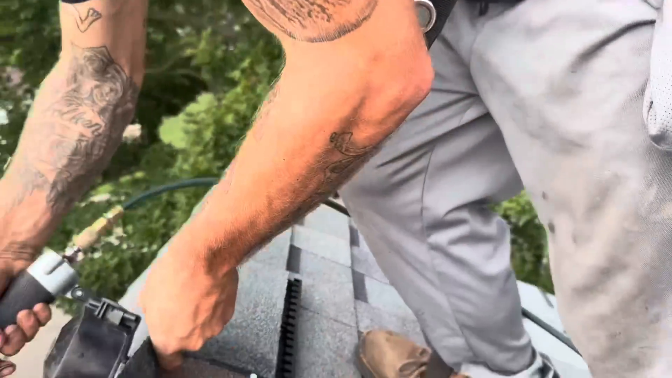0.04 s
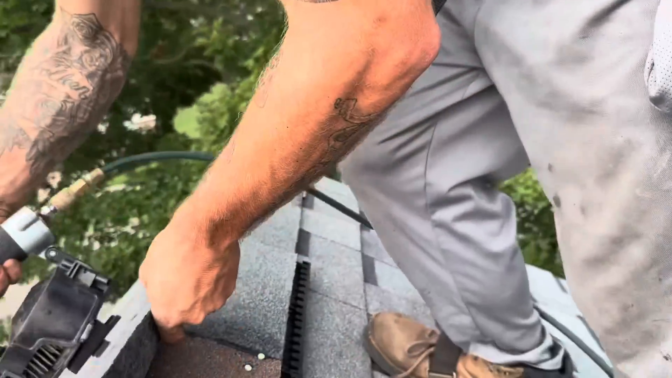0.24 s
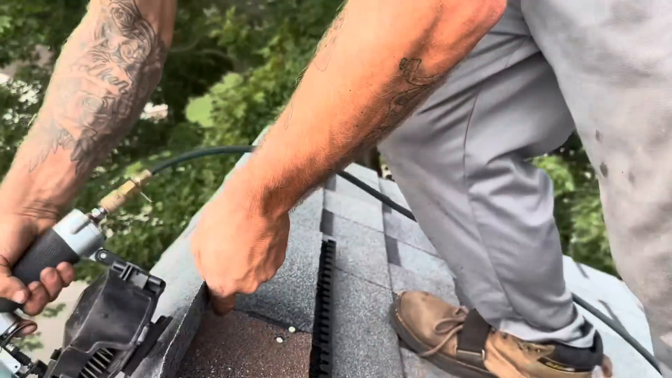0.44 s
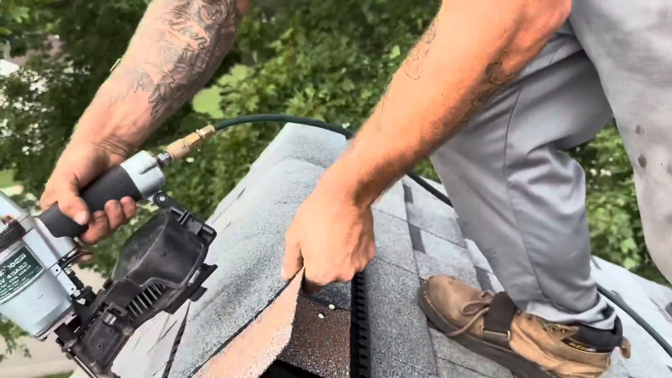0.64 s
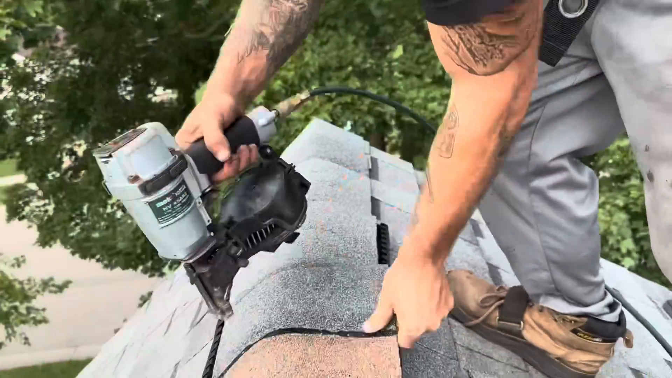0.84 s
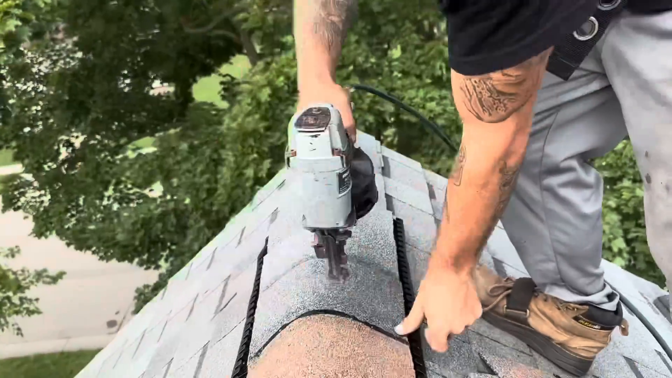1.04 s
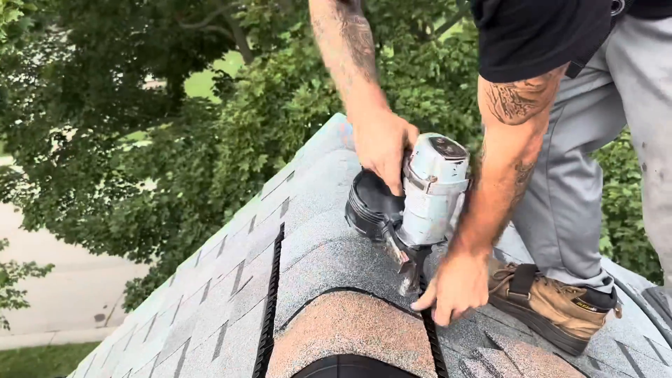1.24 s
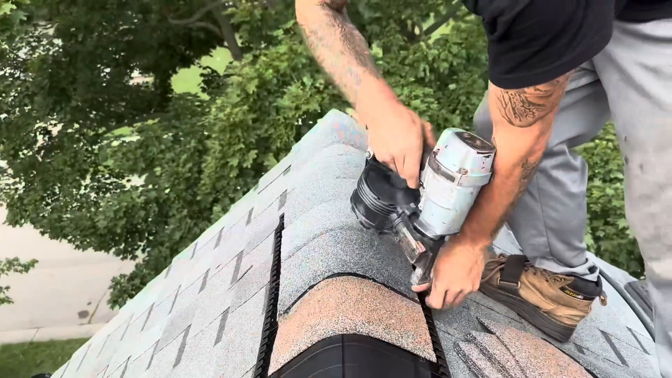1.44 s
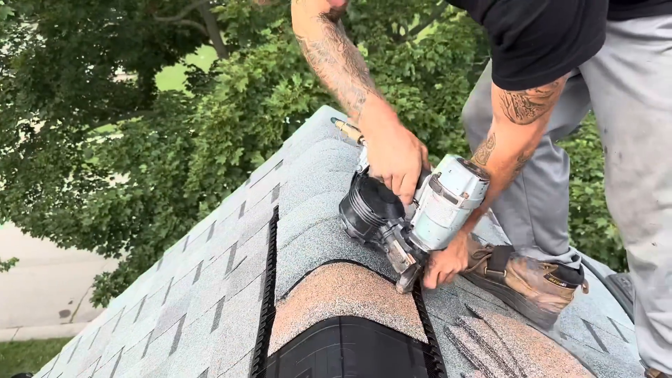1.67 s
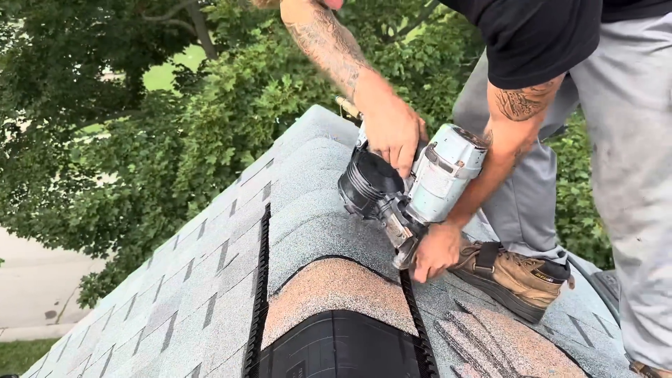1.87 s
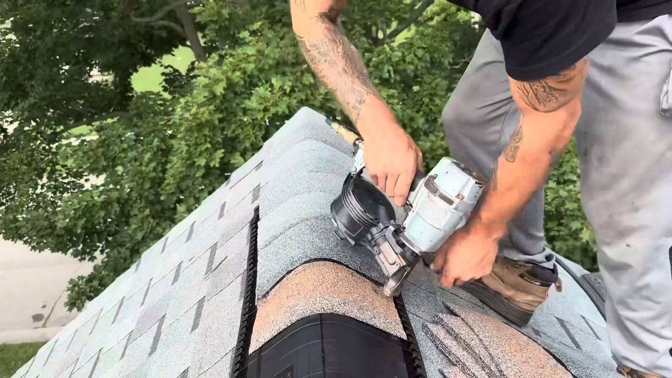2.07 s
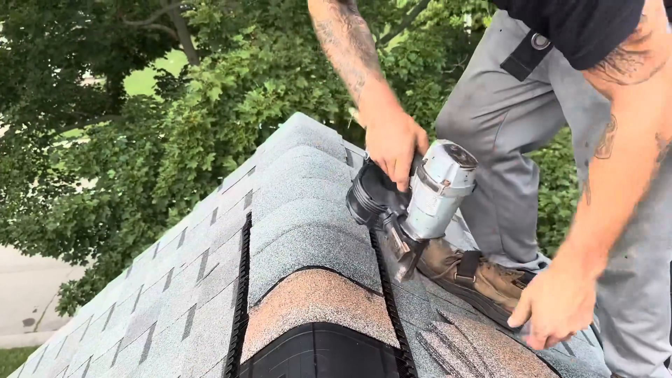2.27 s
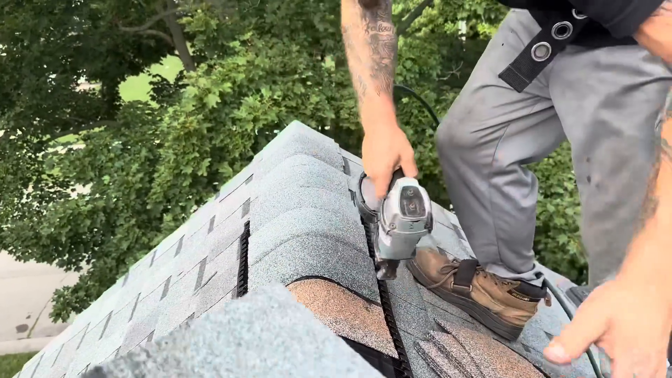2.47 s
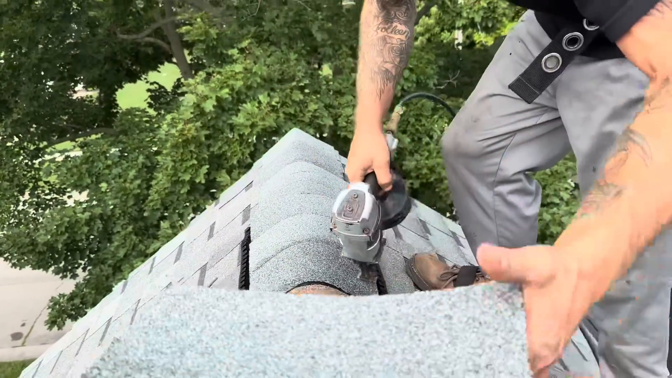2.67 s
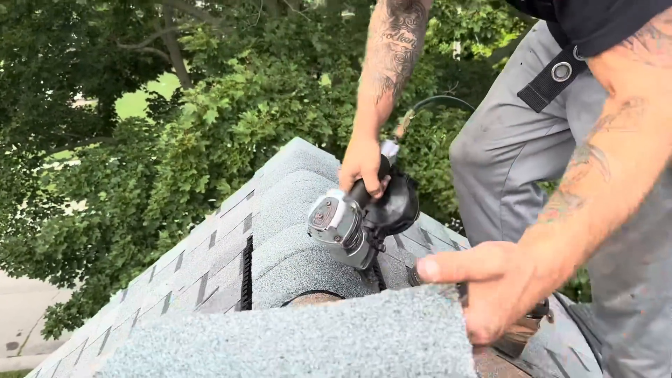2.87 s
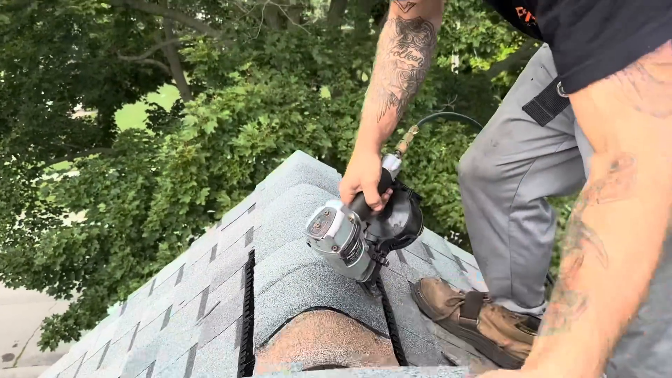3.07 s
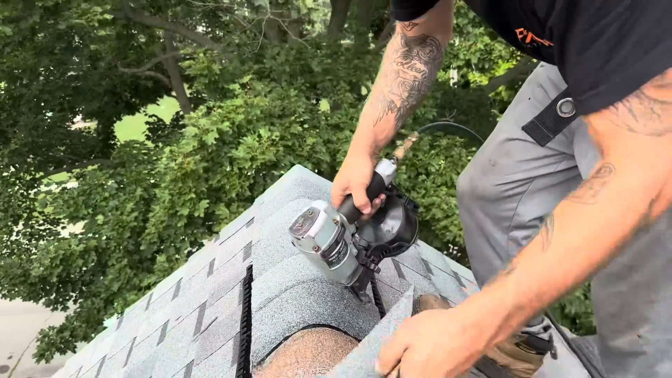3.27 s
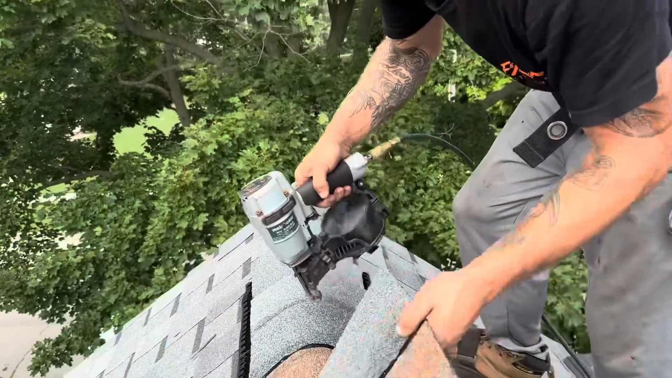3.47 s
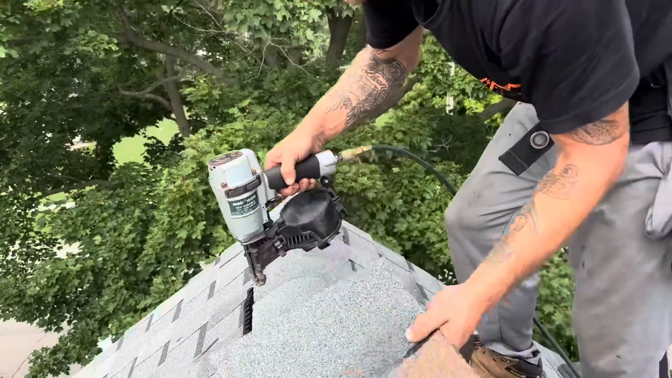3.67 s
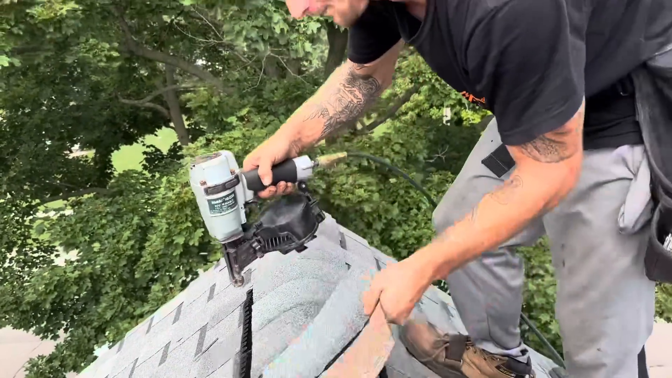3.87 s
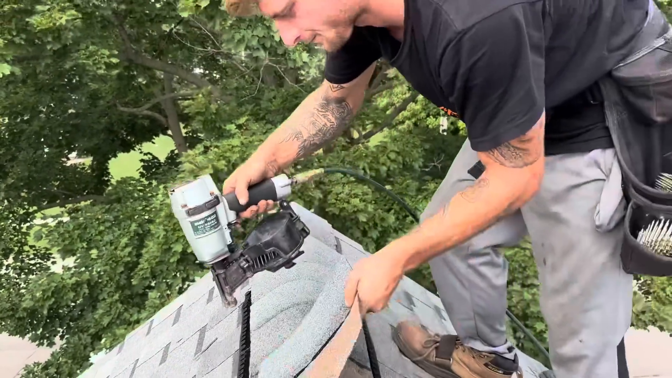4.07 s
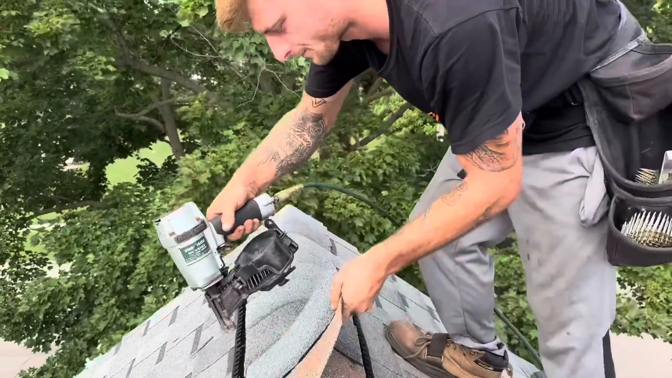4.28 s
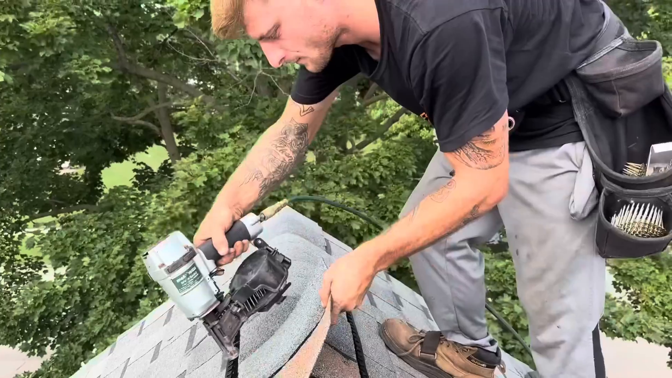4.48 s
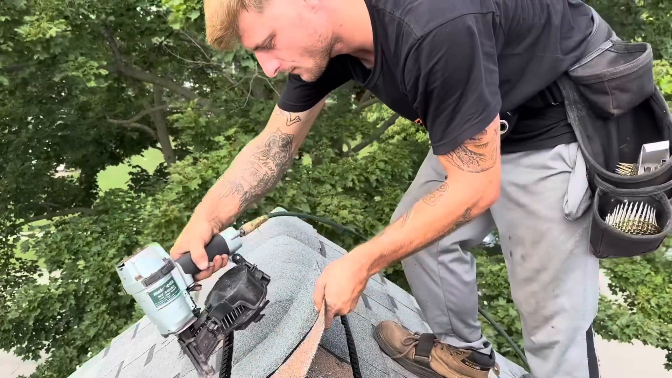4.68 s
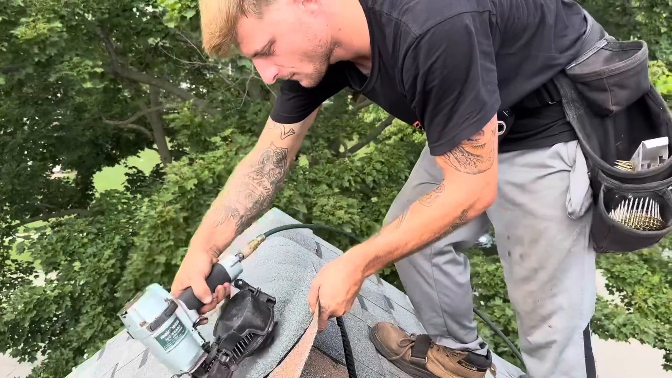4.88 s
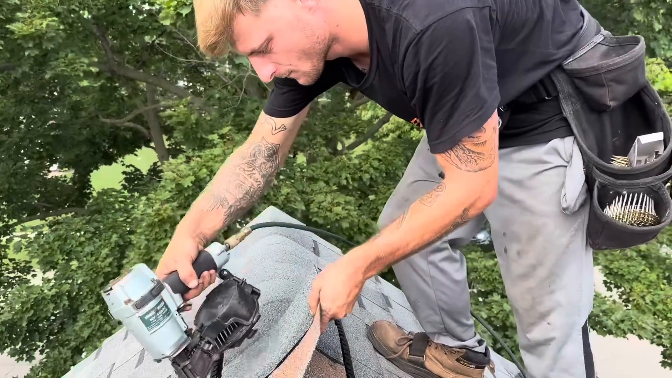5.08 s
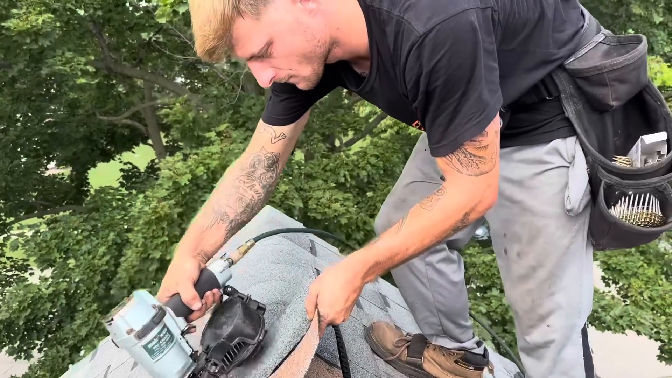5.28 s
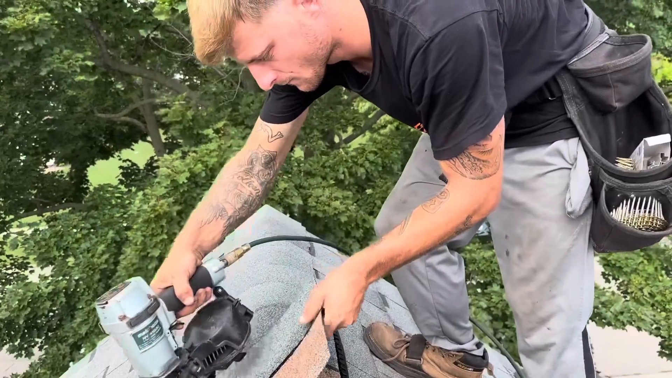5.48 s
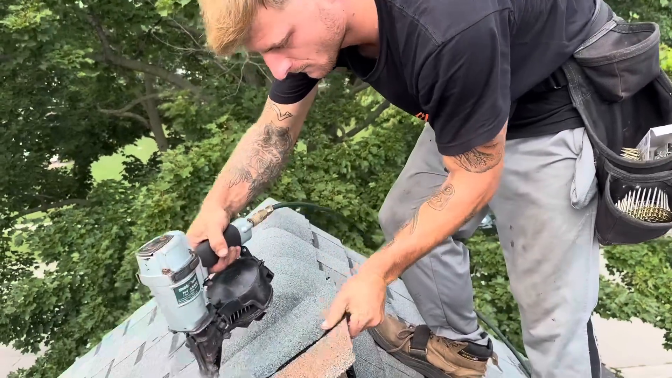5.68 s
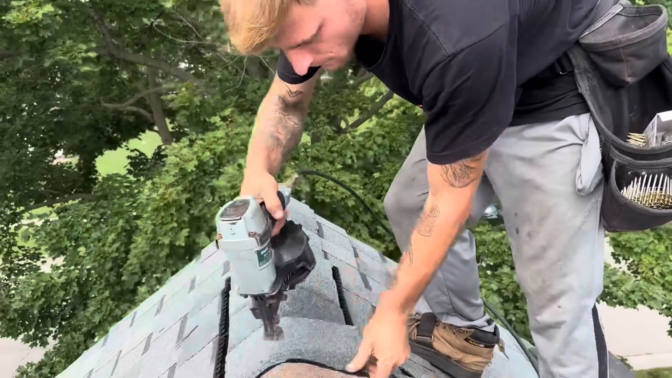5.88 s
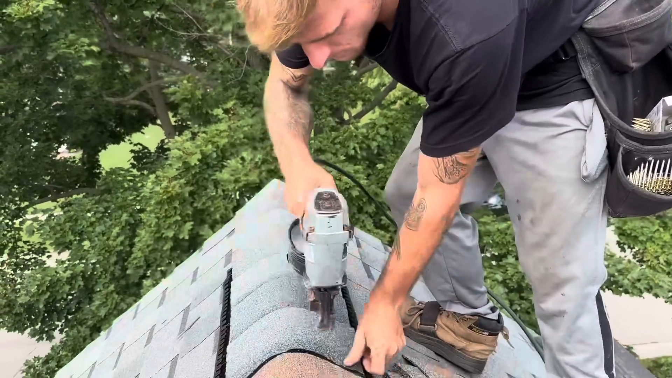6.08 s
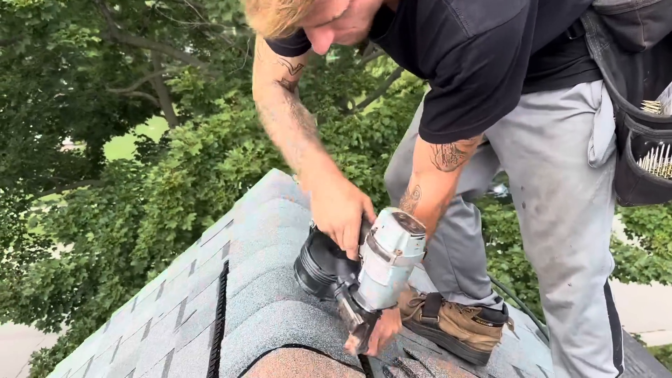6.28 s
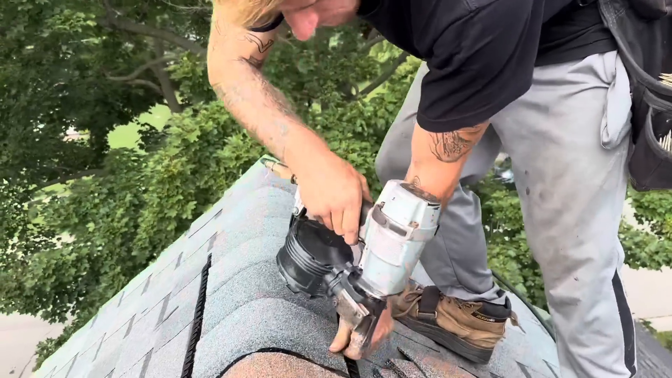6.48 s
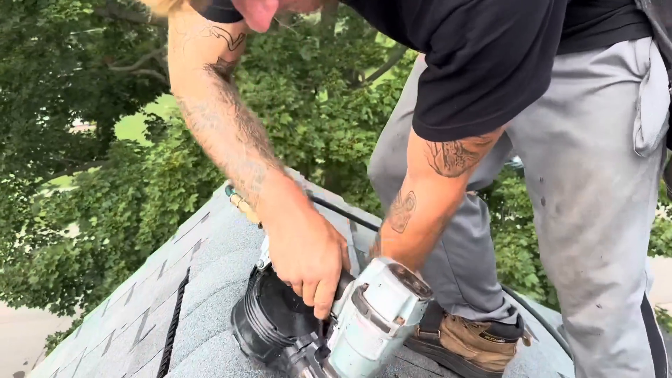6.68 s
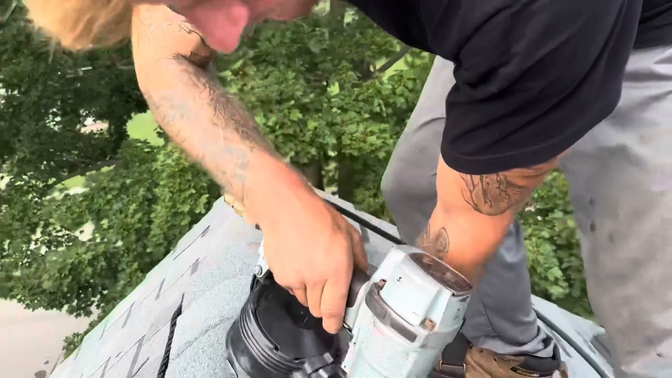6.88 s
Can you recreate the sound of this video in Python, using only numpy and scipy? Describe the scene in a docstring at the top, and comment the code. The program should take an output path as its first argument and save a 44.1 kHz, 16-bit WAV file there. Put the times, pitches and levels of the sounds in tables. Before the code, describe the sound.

A compressed-air nailer cracks seven sharp shots into a shingled roof, with bright hissing leaks around them and gritty shingle scrapes between.

```python
"""Shingle roof: a compressed-air nailer at arm's length from two microphones. Air leaks from the pressed
trigger valve as wavering, coloured noise. Each shot is a valve tick, three metal knocks of ringing tool modes,
and a falling thud through the deck, which booms on in beating modes. Between rounds hands drag gritty shingles:
noise grains, slaps and ticks over a faint hum. Spent air buffets the microphones as low fluttering noise."""
import sys
import numpy as np
from scipy import signal
from scipy.fft import rfft, irfft
from scipy.io import wavfile
from scipy.ndimage import uniform_filter1d

SR = 44100
rng = np.random.default_rng(int(sys.argv[2]) if len(sys.argv) > 2 else 0)


def transcribe(signal):
    """Save signal, clipped to [-1, 1], as a 16-bit WAV file at the path in sys.argv[1]."""
    frames = np.atleast_2d(signal).T
    limited = np.clip(frames, -1, 1)
    pcm = np.round(limited * 32767).astype(np.int16)
    wavfile.write(sys.argv[1], SR, pcm)


N = 305425
T = np.arange(N) / SR
F = np.maximum(np.fft.rfftfreq(N, 1 / SR), 1)

# Jet spectrum: [pitch_hz, density_db_per_hz]
JET_SPECTRUM = [(300, -24), (900, -22), (2000, -14.5), (3000, -12), (4000, -10.5), (5400, -9), (6800, -6.5),
                (8500, -1.5), (9600, -5), (11300, 3), (12300, 4.5), (13200, 3.5), (14000, 8), (15000, -2.5)]
# Trigger holds: [press_s, release_s, top_level_db, drift_db_per_s, high_share_db, low_share_db, build_up_s,
# overshoot_db, puff_level_db, puff_length_s]
TRIGGER_HOLDS = [(-.3, 0.523, -24, -3.5, 1, -5, .02, 7, -30.5, 0.03),
                 (1.193, 2.121, -24, 2.5, -1.5, -7.5, 0.029, 8, -33.5, 0.0045),
                 (4.423, 5.454, -23, 0, -2.5, -8, 0.0072, 4, -30, 0.0045),
                 (6.233, 7.195, -23, 3, -0.5, -7.5, 0.023, 4, -38, .006)]
# Tool position per hold, where the ports hear the leak in opposite phase: [null_hz, width_hz]
PORT_NULLS = [(2700, 600), (7400, 300), (3150, 1000), (5500, 600)]
SURGE_S, LOW_SURGE = 0.076, 1.9  # overshoot decay; lows overshoot more
SHUT_S, SHUT_DB, BLEED_DB_PER_S, TOP_BLEED_DB_PER_S = 0.023, 23, 71.5, 88  # top bleed adds to the common bleed
LOW_SAG, LOW_CUT = 0.88, 0.45  # share of sag and cut felt by the lows


def leak():
    """Turbulent jet from the trigger valve; each narrow band wavers as the tool turns in the hand."""
    low, high, top = jet_bands()
    sag_db, cut_db = pressure()
    out = 0
    for hold, (null_hz, width_hz) in zip(TRIGGER_HOLDS, PORT_NULLS):
        press, release, top_db, drift_db, high_db, low_db, build_s, surge_db, puff_db, puff_s = hold
        since, after = np.maximum(T - press, 0), np.maximum(T - release, 0)
        opened = 1 - np.exp(-since / build_s)
        surge = surge_db * np.exp(-since / SURGE_S)
        shut = undb(-SHUT_DB * (1 - np.exp(-after / SHUT_S)) - BLEED_DB_PER_S * after)
        held = undb(top_db + drift_db * np.minimum(since, release - press)) * opened * shut
        puff = undb(puff_db) * np.exp(-((T - release) / puff_s) ** 2)
        upper_gain = held * undb(surge - sag_db - cut_db) + puff
        low_swing_db = LOW_SURGE * surge - LOW_SAG * sag_db - LOW_CUT * cut_db
        low_gain = held * opened * undb(low_swing_db) + puff  # lows build up later
        jet = upper_gain * (top * undb(-TOP_BLEED_DB_PER_S * after) + undb(high_db) * high)
        jet = jet + low_gain * undb(low_db) * low
        out = out + ports(jet, np.pi * (1 + np.tanh((F - null_hz) / width_hz)))
    return out


def jet_bands():
    """Jet noise in third-octave bands wavering apart, summed to low, high and top parts of rms 1."""
    jet = colour(noise(), JET_SPECTRUM)
    low, high, top = 0, 0, 0
    for hz in 300 * 2 ** np.arange(0, 5.9, 1 / 3):
        part = band(jet, hz / 1.104, hz * 1.115) * undb(0.78 * walk(1.5) + 1.1 * walk(40))
        if hz < 6500:
            low = low + part
        elif hz < 10500:
            high = high + part
        else:
            top = top + part
    return unit(low), unit(high), unit(top)


CHOKE_DB, CHOKE_RISE_S = 2.5, 0.0043
SAG_S, REFILL_S = .015, .14
SWELL_DB, SWELL_S = 1.5, 0.064  # leak swells as the nose is pushed down
CUT_FALL_S, CUT_ENDS_S, CUT_RISE_S = 0.0083, 0.056, 0.013


def pressure():
    """Leak drop in dB: choke in the stroke, sag and refill after; recoil can lift the finger, a brief cut."""
    sag, cut = 0, 0
    for s, stroke_s, *_, sag_db, cut_db in SHOTS_FIRED:
        back = s + stroke_s + RETURN_S
        sag = sag + sag_db * ramp(back, SAG_S) * np.exp(-np.maximum(T - back, 0) / REFILL_S)
        sag = sag - SWELL_DB * ramp(s - SWELL_S, SWELL_S) * (T < s)
        cut = cut + CHOKE_DB * ramp(s, CHOKE_RISE_S) * (T < s + stroke_s)
        cut = cut + cut_db * ramp(back, CUT_FALL_S) * (1 - ramp(back + CUT_ENDS_S, CUT_RISE_S))
    return sag, cut


# Shots: [blow_s, exhaust_after_s, blow_db, blow_hz, exhaust_db, return_db, thud_db, thud_glide_s, thud_fall_s,
# boom_share_db, pressure_sag_db, leak_cut_db (negative: leak rises)]
SHOTS_FIRED = [(.02, 0.016, -4, 1480, -6, -9, -18, 0.0091, 0.012, -41, 6.5, -4.5),
               (.379, 0.018, -2.5, 1250, -10, -9.5, -12.5, .005, 0.0099, -55, 10.5, -3.5),
               (1.636, .026, 0, 1180, -7, -8.5, -15, 0.013, 0.0076, -38.5, 8.5, 10.5),
               (2.015, .022, -2.5, 1080, -8, -10, -10, 0.057, 0.007, -24.5, 10, 6),
               (4.914, .017, -1, 1550, -8, -7.5, -14.5, .007, .01, -18.5, 8, -2),
               (5.321, 0.02, -3, 1440, -8.5, -11.5, -11, 0.0058, 0.011, -18, 5, 3.5),
               (6.688, 0.017, -1, 1530, -8, -8.5, -10, 0.0079, 0.012, -32, 12.5, 15)]
VALVE_LEAD_S, VALVE_DB, VALVE_HZ, VALVE_CRACK_DB = .0088, -13.5, 1350, 7.5
RETURN_S, EXHAUST_HZ, RETURN_HZ = .0145, 1140, 850  # piston return follows the exhaust
BLOW_CRACK_DB, EXHAUST_CRACK_DB, RETURN_CRACK_DB = -4, 5, 0.5
VENT_DB, VENT_S = -25, 0.012  # spent air rushes out after the return
PRESS_S, PRESS_DB, CLATTER_DB = 0.033, -32, -26  # nose scuffs down before the blow


def shots():
    """Nose press, valve tick, blow, exhaust and return knocks; vented air; loose parts clatter in the stroke."""
    out = np.zeros((2, N))
    for s, stroke_s, blow_db, blow_hz, exhaust_db, return_db, *_ in SHOTS_FIRED:
        exhaust = s + stroke_s
        back = exhaust + RETURN_S
        add(out, s - .001, undb(blow_db) * knock(blow_hz, BLOW_CRACK_DB))
        add(out, exhaust, undb(exhaust_db) * knock(EXHAUST_HZ, EXHAUST_CRACK_DB))
        add(out, back, undb(return_db) * knock(RETURN_HZ, RETURN_CRACK_DB))
        tick = knock(VALVE_HZ, VALVE_CRACK_DB) * burst(0.00026, 0.0033)
        add(out, s - VALVE_LEAD_S, undb(VALVE_DB) * tick)
        vent = unit(band(rng.standard_normal((2, 4000)), 1500, 8000)) * burst(0.0017, VENT_S, size=4000)
        add(out, back, undb(VENT_DB) * vent)
        jolts = undb(4.0 * np.repeat(rng.standard_normal(100), 40))
        scuff, loose = rng.standard_normal((2, 2, 4000)) * jolts
        scuff = unit(band(scuff, 600, 2500)) * burst(0.005, 0.016, size=4000)
        clatter = unit(band(loose, 200, 1500)) * burst(0.011, 0.018, size=4000)
        add(out, max(s - PRESS_S, 0), undb(PRESS_DB) * scuff)
        add(out, s, undb(CLATTER_DB) * clatter)
    return out


# Tool body modes: [pitch_hz (before grip detuning), level_db, t60_s]
TOOL_MODES = [(447, -4, 0.023), (727, -7.5, 0.041), (1070, -3.5, 0.0096), (1390, -2.5, 0.013),
              (1490, 3.5, 0.01), (1950, -6, 0.0081), (2133, -4.5, 0.029), (3100, -6.5, 0.02),
              (4450, 1, 0.025)]


def knock(hz, crack_db):
    """A few ms of rattle rings the tool body, held a little differently each time, and cracks in the treble."""
    push, air = rng.standard_normal((2, 2, 2600))
    grip = 1 + 0.12 * rng.standard_normal(len(TOOL_MODES))
    rattle = undb(4.0 * np.repeat(rng.standard_normal(130), 20))
    modes = [(f * g, db, t60) for (f, db, t60), g in zip(TOOL_MODES, grip)]
    body = ring(band(push * rattle * burst(.001, 0.0019), hz / 3.07, hz * 2.57), modes)
    crack = band(air * rattle, 2800, 17000) * burst(0.0026, 0.0036)
    return body / abs(body).max() + undb(crack_db) * crack / abs(crack).max()


# Roof deck modes: [pitch_hz, level_db, t60_s]
DECK_MODES = [(48, 2.5, 0.81), (57.3, -6, 0.9), (64.5, -1, 0.63)]
# Boots and tool set down on the deck: [start_s, level_db, boom_share_db]
SET_DOWNS = [(2.173, -34.5, -25), (2.243, -42, -11), (5.514, -20, -44)]
THUD_LAG_S, THUD_HZ, THUD_END_HZ, THUD_RISE_S = 0.0022, 280.5, 45, 0.099
BUMP_HZ, BUMP_GLIDE_S, BUMP_FALL_S = 457, 0.0063, .006


def thuds():
    """Deck bending waves: highs arrive first, scattered by the rafters; then it booms on in beating modes."""
    out, kick, t = np.zeros((2, N)), np.zeros((2, N)), np.arange(6000) / SR
    blows = []
    for s, stroke_s, *_, db, glide_s, fall_s, boom_db, _, _ in SHOTS_FIRED:
        blows.append((s + stroke_s + THUD_LAG_S, db, THUD_HZ, glide_s, fall_s, boom_db))
    for s, db, boom_db in SET_DOWNS:
        blows.append((s, db, BUMP_HZ, BUMP_GLIDE_S, BUMP_FALL_S, boom_db))
    for s, db, first_hz, glide_s, fall_s, boom_db in blows:
        hz = THUD_END_HZ + (first_hz - THUD_END_HZ) * np.exp(-t / glide_s)
        wave = np.sin(2 * np.pi * np.cumsum(hz) / SR + np.array([[0], [np.pi / 2]]))
        scatter = unit(band(band(rng.standard_normal((2, 6000)), 60, 390), 60, 390))
        rough = undb(0.41 * db)  # hard blows shake more of the framing
        thud = burst(THUD_RISE_S, fall_s, size=6000) * wave
        thud = thud + rough * burst(0.011, 0.0071, size=6000) * scatter
        add(out, s, undb(db) * thud)
        add(kick, s + .05, undb(db + boom_db) * np.hanning(440) / 160)
    kick[1] = np.roll(kick[1], 200)  # second row 200 samples late
    return out + ring(kick, DECK_MODES)


# Scraped shingle resonances: [pitch_hz, level_db]
GRIT_MODES = [(480, -7), (700, 1), (1000, 1.2), (1400, 2.2), (1900, -4), (2500, -4.5), (3300, -11)]
# Shingles dragged or shifted: [start_s, end_s, first_db, last_db, treble_share_db]
SHINGLE_DRAGS = [(0.543, 0.663, -47, -55, -2), (0.707, 0.753, -47, -50.5, -15),
                 (.75, .84, -47, -49.5, -6.5), (0.884, 0.983, -56, -55.5, -6),
                 (0.988, 1.025, -38, -46, -18.5), (1.026, 1.2, -60.5, -57.5, -8.5),
                 (2.624, 2.677, -53, -53.5, -7), (2.746, 3.14, -59.5, -64.5, -14.5),
                 (3.244, 3.288, -42.5, -29.5, -14), (3.302, 3.349, -57, -39, -8),
                 (3.357, 3.405, -49, -45, -13), (3.403, 3.447, -43, -45, -12), (3.76, 3.93, -28, -43, -8),
                 (3.943, 4.099, -67, -50, -6.5), (4.102, 4.42, -50, -63.5, -8.5),
                 (5.877, 5.933, -74, -60, -6), (6.104, 6.225, -63, -68, -1)]
# Shingle slaps and grit ticks: [start_s, peak_db, pitch_hz, treble_share_db]
SLAPS = [(0.646, -50, 1080, -6), (0.712, -16.5, 960, -31), (0.756, -32, 2300, -13), (0.765, -26, 1290, -16),
         (0.799, -31.5, 2330, -15), (0.82, -30, 1400, -25), (0.893, -51, 1110, 0), (0.959, -43, 1080, -12),
         (0.995, -31.5, 603, -29), (2.616, -44.5, 913, -18), (2.7, -48, 1070, -20), (2.974, -45, 1410, -30),
         (3.02, -55, 1070, 6), (3.245, -31, 746, -24), (3.271, -20, 960, -12), (3.344, -34.5, 538, -21),
         (3.366, -31, 1060, -26), (3.469, -51, 934, 3), (3.497, -38.5, 1110, -14),
         (3.567, -36, 1250, -17.5), (3.764, -22.5, 705, -8), (3.944, -44, 1800, -18),
         (4.116, -35, 790, -27), (5.913, -50.5, 393, -12.5)]
RUB_DB = 5.5  # plain broad rub under the resonances


def shingles():
    """Dense uneven grit grains whose resonances come and go, in sharp strokes, plus single slaps and ticks."""
    low, high = (noise() * undb(2.5 * rng.exponential(size=N) + 1.8 * walk(130)) for _ in range(2))
    grit = 0
    for hz, db in GRIT_MODES:
        grit = grit + undb(db + 3.9 * walk(70)) * unit(band(low, hz / 1.2, hz * 1.17))
    low = unit(unit(grit) + undb(RUB_DB) * unit(band(low, 420, 1870)))
    high = unit(band(high, 2900, 10820))
    out = 0
    for start, end, first_db, last_db, treble_db in SHINGLE_DRAGS:
        edges = np.clip(np.minimum((T - start) / 0.0045, (end - T) / 0.028 + .5), 0, 1)
        stroke = edges * undb(np.interp(T, [start, end], [first_db, last_db]))
        out = out + stroke * (low + undb(treble_db) * high)
    for s, db, hz, treble_db in SLAPS:
        push = rng.standard_normal((2, 2600))
        slap = band(push * burst(0.00025, 0.0036), hz / 1.57, hz * 1.28)
        slap = band(slap, hz / 2.07, hz * 1.87)
        tick = band(push, 2000, 16000) * burst(0.00033, 0.0032)
        add(out, s, undb(db) * (slap / abs(slap).max() + undb(treble_db) * tick))
    return out


# Spent air swirling over the microphones: [start_s, end_s, level_db]
GUSTS = [(4.681, 4.904, -39.5), (5.034, 5.25, -32.5), (6.291, 6.32, -40)]
FLUTTER_HZ, FLUTTER_DEPTH = 21.88, 0.65  # depth before squaring


def buffet():
    """Low turbulence in fluttering puffs."""
    swirl = unit(band(band(noise(), 70, 310), 70, 270)) * undb(2.1 * walk(30))
    gusts = 0
    for start, end, db in GUSTS:
        flutter = 1 - FLUTTER_DEPTH * np.cos(np.pi * FLUTTER_HZ * (T - start) + .4) ** 2
        gusts = gusts + undb(db) * ramp(start, 0.015) * (1 - ramp(end, .02)) * flutter ** 2
    return swirl * gusts


# Hum spectrum: [pitch_hz, density_db_per_hz]
HUM_SPECTRUM = [(20, -47.5), (40, -14), (75, -4), (100, 0.5), (125, -6.5), (183, -12.5), (275, -13),
                (415, -24), (700, -21), (1700, -31), (6300, -34.5), (9500, -43), (15500, -46)]
# Hum level: [time_s, level_db]
HUM_LEVEL = [(0, -53.5), (1.2, -62.5), (2.3, -58.5), (4.2, -54.5), (5.8, -56.5), (6.93, -52.5)]


def hum():
    """Distant motors and leaves: coloured noise wavering a little."""
    level_db = np.interp(T, *np.transpose(HUM_LEVEL))
    return unit(colour(noise(), HUM_SPECTRUM)) * undb(level_db + 1.9 * walk(8.1))


# Microphone pair: [pitch_hz, likeness_0_to_1, left_minus_right_db, left_lead_rad]
MIC_PAIR = [(30, .9, 0, 0), (120, .86, 0, 0), (400, .7, 0, 0), (800, .5, 0, 0), (1500, .6, -5.5, 0),
            (3000, .75, -1, .5), (5000, .75, -1, .6), (7000, .5, 2.5, 1), (8100, .95, 0, 6.28),
            (8800, .97, 0, 6.28), (9600, .7, 0, 4.7), (10400, .999, 0, 3.14), (11900, .999, 0, 3.14),
            (12700, .7, 0, 1.7), (13700, .99, 0, 0), (15000, .99, 0, 0), (16000, .75, 0, -.5)]


def ports(sound, turn=0):
    """The pair hears the bass alike; above 8 kHz the phase between the ports turns through a full circle."""
    shared, own = rfft(sound)
    hz, *columns = np.transpose(MIC_PAIR)
    like, pan_db, lead = (np.interp(F, hz, c) for c in columns)
    like = like + (1 - like) * .9 * np.sin(turn / 2) ** 2  # more alike near a null
    mid, side = shared * np.sqrt((1 + like) / 2), own * np.sqrt((1 - like) / 2)
    left = (mid + side) * undb(pan_db / 2)
    right = (mid - side) * undb(-pan_db / 2) * np.exp(-1j * (lead + turn))
    return irfft(np.array([left, right]), N)


def undb(db):
    """Decibels to gain."""
    return 10 ** (np.asarray(db) / 20)


def noise():
    """Two unrelated rows: what both microphones share, and what they do not."""
    return rng.standard_normal((2, N))


def band(x, lo_hz, hi_hz):
    """Band-pass."""
    return signal.sosfilt(signal.butter(2, [lo_hz, min(hi_hz, .45 * SR)], "band", fs=SR, output="sos"), x)


def unit(x):
    """Scale to rms 1."""
    return x / np.sqrt(np.mean(x ** 2))


def colour(x, table):
    """Shape a spectrum by (Hz, dB) points."""
    hz, db = np.transpose(table)
    return irfft(rfft(x) * undb(np.interp(np.log(F), np.log(hz), db)), N)


def walk(rate_hz):
    """Random levels joined by straight slews of 1 / rate_hz seconds; spread about 1.5."""
    k = int(SR / rate_hz)
    return 1.8 * uniform_filter1d(np.repeat(rng.standard_normal(N // k + 1), k), k)[:N]


def ring(x, modes):
    """Damped resonators driven by x."""
    out = 0
    for hz, db, t60_s in modes:
        pole = np.exp(2j * np.pi * hz / SR - np.log(1000) / (t60_s * SR))
        out = out + undb(db) * signal.lfilter([1], [1, -pole], x).imag
    return out


def burst(rise_s, fall_s, size=2600):
    """Envelope of a blow, peak 1."""
    t = np.arange(size) / SR
    e = (1 - np.exp(-t / rise_s)) * np.exp(-t / fall_s)
    return e / e.max()


def ramp(start_s, length_s):
    """0 before start, 1 after start + length."""
    return np.clip((T - start_s) / length_s, 0, 1)


def add(out, start_s, x):
    """Mix x in at start_s."""
    i = int(start_s * SR)
    out[..., i:i + x.shape[-1]] += x[..., :N - i]


def scene():
    """Everything on the roof as the two microphones hear it."""
    return leak() + ports(shots() + thuds() + shingles() + buffet() + hum())


TOP_HZ = 15900


def record(dry):
    """Round the loudest peaks, then cut everything above TOP_HZ."""
    rounded = np.tanh(0.93 * dry) / 0.87
    return signal.sosfilt(signal.ellip(10, .2, 80, TOP_HZ, fs=SR, output="sos"), rounded)


dry = scene()
out = record(dry)
transcribe(out)
```